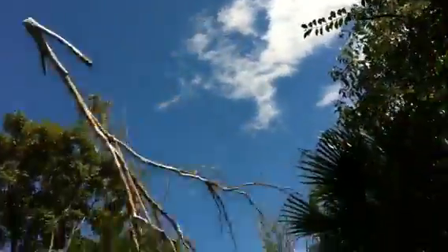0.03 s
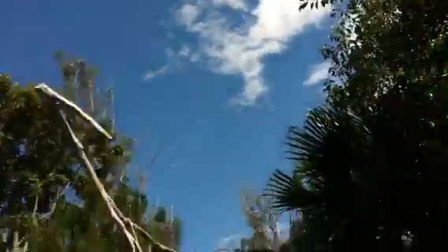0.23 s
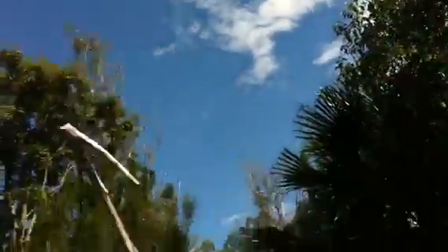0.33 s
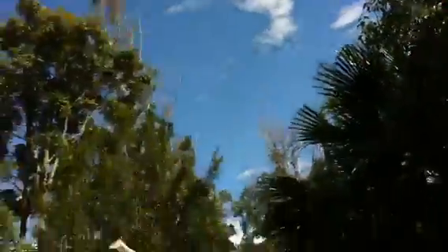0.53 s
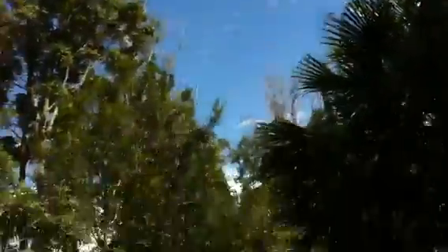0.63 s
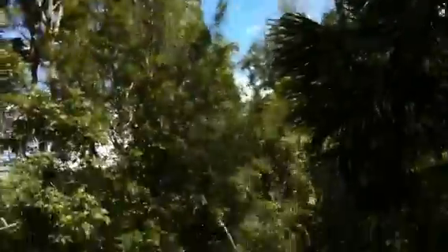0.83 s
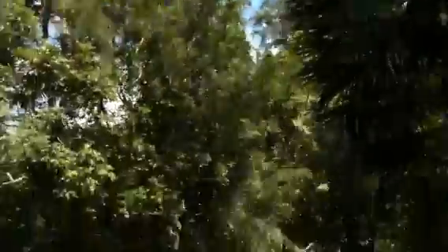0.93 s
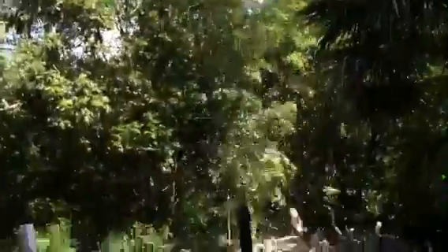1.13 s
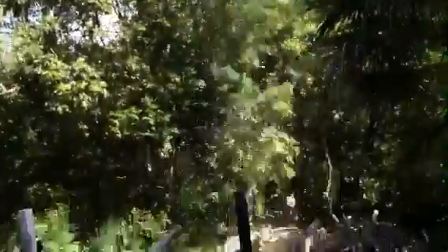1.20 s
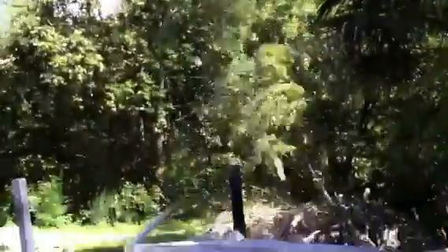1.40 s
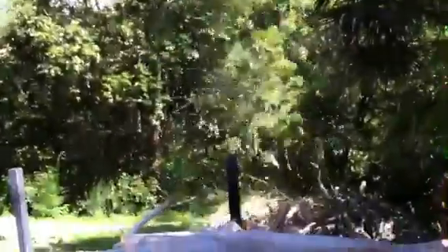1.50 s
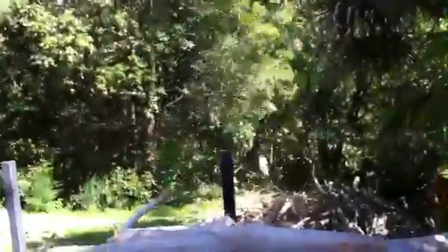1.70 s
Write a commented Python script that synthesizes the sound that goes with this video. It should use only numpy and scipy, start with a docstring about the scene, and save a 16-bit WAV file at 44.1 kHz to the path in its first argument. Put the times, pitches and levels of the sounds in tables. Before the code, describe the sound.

Dead tree crashing into bushland with a rush of breaking twigs and a thud.

```python
"""Dry twigs crackle in a thickening rush as a dead tree topples into the bush. Branches snap as the
crown is crushed, heavy limbs rumble, the trunk thuds down and bounces, and the debris settles.
Each brittle fracture is an impulse, and in the thicker wood it excites damped resonances; each blow
on the ground rings the modes of the trunk. The surrounding trees scatter the sound over a faint hiss."""
import sys
import numpy as np
from scipy import signal
from scipy.fft import rfft, irfft
from scipy.io import wavfile
from scipy.ndimage import uniform_filter1d

SR = 44100
rng = np.random.default_rng(int(sys.argv[2]) if len(sys.argv) > 2 else 0)


def store_pcm(level_fs):
    """Save levels as 16-bit WAV."""
    pcm = np.round(np.clip(level_fs, -1, 1) * 32767).astype(np.int16)
    wavfile.write(sys.argv[1], SR, np.atleast_2d(pcm).T)


N = 77175


def undb(db):
    """Decibels to amplitude ratio."""
    return 10 ** (np.asarray(db) / 20)


def unit(x):
    """Normalisation to rms 1."""
    return x / np.sqrt(np.mean(x ** 2) + 1e-20)


def burst(x, window_s=0.02):
    """Normalisation of a transient to the energy of one window at rms 1."""
    return x * np.sqrt(window_s * SR / (np.sum(x ** 2) + 1e-20))


def steady(x, size=2205):
    """Normalisation of a random stream by its running rms."""
    return x / np.sqrt(uniform_filter1d(x ** 2, size) + 1e-12)


def envelope(points):
    """Amplitude envelope through (time [s], level [dB]) points."""
    return undb(np.interp(np.arange(N) / SR, *np.array(points).T))


def colour(x, points, size=4096):
    """Minimum-phase filtering through (frequency [Hz], gain [dB]) points."""
    hz, db = np.array(points).T
    bin_hz = np.arange(size // 2 + 1) * SR / size
    gain = undb(np.interp(np.log(bin_hz + 1), np.log(hz), db))
    cepstrum = irfft(np.log(gain))
    cepstrum[1:size // 2] *= 2  # folding the cepstrum makes the filter causal
    cepstrum[size // 2 + 1:] = 0
    response = irfft(np.exp(rfft(cepstrum)))
    return signal.fftconvolve(x, response)[:len(x)]


def resonate(x, hz, q):
    """Forced response of a damped oscillator, with Q no lower than 0.5."""
    return signal.lfilter(*signal.iirpeak(min(hz, SR / 4), max(q, 0.5), fs=SR), x)


def clicks(per_s, spread_db):
    """Poisson process of impulses, mostly small and a few large."""
    strength = undb(spread_db * np.minimum(rng.exponential(size=N), 4.5))
    return (rng.random(N) < per_s / SR) * strength * np.sign(rng.standard_normal(N))


def crumble(x, decay_s, tail_db):
    """Exponential decay: the energy of each impulse feeds a short tail of noise."""
    pole = np.exp(-1 / (decay_s * SR / 2))
    power = signal.lfilter([1 - pole], [1, -pole], x ** 2)
    return x + undb(tail_db) * rng.standard_normal(len(x)) * np.sqrt(power)


def add(out, at_s, x):
    """Superposition of a sound at its onset time."""
    start = max(int(at_s * SR), 0)
    out[start:start + len(x)] += x[:N - start]


# Spectrum of the outdoor hiss (frequency [Hz], relative level [dB])
AIR_SPECTRUM = [(25, -1), (90, -15), (190, 6), (350, 5), (900, -2.5), (2500, -6.5), (5000, -4.5),
                (9000, -4.5), (16000, -13.5)]
def air(level_db=-45.5):
    """Stationary filtered noise gives a faint outdoor hiss."""
    return undb(level_db) * unit(colour(rng.standard_normal(N), AIR_SPECTRUM))


def scatter(x, t60_s=0.85, wet_db=-14.5):
    """Multiple scattering among the trees adds a dense, exponentially decaying tail."""
    t = np.arange(N) / SR
    tail = rng.standard_normal(N) * np.exp(-np.log(1000) * t / t60_s)
    return x + undb(wet_db) * signal.fftconvolve(x, tail / np.linalg.norm(tail))[:N]


STEM_HZ = 219.3
def stem_hum(at_s=0.105, level_db=-34.5, rise_s=0.025, fall_s=0.022):
    """Damped vibration: one mode of the stem swells and dies away after the first crack."""
    age = np.maximum(np.arange(N) / SR - at_s, 0)
    rise = np.minimum(age / rise_s, 1)
    fall = np.exp(-np.maximum(age - rise_s, 0) / fall_s)
    return undb(level_db) * rise * fall * np.sin(2 * np.pi * STEM_HZ * age)


# Envelope of the twig crackle (time [s], level [dB])
TWIG_LEVELS = [(0, -45), (.047, -48), (.060, -33), (.09, -27.5), (.12, -28.5), (.195, -39.5), (.215, -32.5),
               (.28, -33), (.36, -28), (.40, -22.5), (.44, -25.5), (.57, -24.5), (.672, -25.5), (.697, -18),
               (.74, -22.5), (.80, -22), (.92, -23.5), (1.01, -32), (1.13, -29.5), (1.23, -41),
               (1.37, -46.5), (1.5, -52.5), (1.75, -56)]
# Spectrum of the twig crackle (frequency [Hz], relative level [dB])
TWIG_SPECTRUM = [(80, -36), (150, -14), (400, -3), (1200, 2), (2500, 0.5), (5000, 4), (8500, 6), (12000, 2),
                 (16000, -4.5)]
def twigs():
    """Brittle fracture: thousands of dry twigs break, each with a sharp broadband tick."""
    ticks = crumble(clicks(per_s=3600, spread_db=1.5), decay_s=0.0044, tail_db=3.5)
    return steady(colour(ticks, TWIG_SPECTRUM)) * envelope(TWIG_LEVELS)


# Envelope of the small branches being crushed (time [s], level [dB])
CRUSH_LEVELS = [(0, -100), (.26, -40.5), (.42, -38), (.5, -28.5), (.53, -29.5), (.68, -29), (.73, -20),
                (.805, -19.5), (.84, -17.5), (.92, -20.5), (1.03, -28.5), (1.14, -26), (1.23, -40),
                (1.45, -49.5), (1.75, -54)]
# Spectral weighting of their cracks (frequency [Hz], relative gain [dB])
CRUSH_SPECTRUM = [(120, -24), (250, -2), (500, 0), (850, 0.5), (1500, -0.5), (2600, -2.5), (4500, -7),
                  (12000, -40)]
def small_branches(pitches=16, cracks_per_s=2200):
    """Impulse response: sticks of many sizes crack, each ringing for a few cycles at its own pitch."""
    cracks = 0
    for hz in np.geomspace(380, 3800, pitches):
        hits = crumble(clicks(cracks_per_s / pitches, spread_db=3), decay_s=0.0066, tail_db=0)
        cracks = cracks + resonate(hits, hz, q=5.2) + 0.36 * hits
    return steady(colour(cracks, CRUSH_SPECTRUM)) * envelope(CRUSH_LEVELS)


# Envelope of the heavy limbs on the ground (time [s], level [dB])
LIMB_LEVELS = [(0, -59), (.08, -56), (.2, -67), (.26, -46), (.33, -49), (.39, -42.5), (.43, -48),
               (.49, -36), (.53, -38.5), (.57, -39), (.66, -56), (.74, -29.5), (.92, -28), (1.03, -25),
               (1.17, -36), (1.24, -41), (1.45, -65.5), (1.75, -57)]
# Spectrum of their rumble (frequency [Hz], relative level [dB])
LIMB_SPECTRUM = [(25, -5), (70, -18), (120, -12.5), (165, -6.5), (210, -3), (270, -2.5), (340, -0.5),
                 (500, -5.5), (1200, -32)]
def limbs(ring_db=-2.5):
    """Forced vibration: limbs flex and knock on the ground in a rumble that keeps the stem ringing."""
    knocks = clicks(per_s=700, spread_db=2)
    rumble = steady(colour(knocks, LIMB_SPECTRUM))
    ring = steady(resonate(resonate(knocks, STEM_HZ, q=5), STEM_HZ, q=2.9))
    return unit(rumble + undb(ring_db) * ring) * envelope(LIMB_LEVELS)


# Branch fractures (time [s], wood level [dB], resonance [Hz], Q [1], decay time of the tear [s],
# splinter level relative to the wood [dB])
BRANCH_SNAPS = [(0.058, -69, 1620, 0.81, .010, 2), (0.1, -40, 2000, 0.35, 0.0017, 12.5),
                (.107, -38.5, 2300, .6, 0.013, 9.5), (0.207, -42, 2290, 1.3, 0.019, -4),
                (.331, -34.5, 2220, 1.6, .010, 2), (.370, -24.5, 940, 2.6, 0.015, -33),
                (.380, -25.5, 1010, 9, 0.0027, -21), (.472, -28, 1100, 1.1, 0.049, 3.5),
                (.5455, -21.5, 930, 1.3, 0.0046, 0), (.5625, -23, 830, 0.62, 0.013, 2.5),
                (.601, -31.5, 1180, 3.9, 0.0021, -6), (.633, -50, 1280, 1.2, .006, -8),
                (.701, -18, 904, 5.3, 0.033, -0.5), (0.729, -21.5, 1540, 0.47, 0.025, 6),
                (.770, -25.5, 824, 0.68, .008, 0.5), (.820, -13.5, 850, 2.4, .012, -11),
                (.832, -17, 696, 5.6, 0.013, -6.5), (.8665, -20.5, 1400, 0.74, .007, -4),
                (.908, -20, 950, 0.68, 0.013, -9), (.957, -24, 790, 1.1, 0.029, -14),
                (.981, -24.5, 610, 1.9, 0.011, -12), (1.060, -23, 750, 6, 0.056, -24),
                (1.110, -23.5, 733, 1.2, 0.034, -18), (1.139, -29, 1320, 1.2, 0.0025, -9),
                (1.351, -43.5, 1944, 0.55, .006, 1)]
# Spectrum of the splinters (frequency [Hz], relative level [dB])
SPLINTER_SPECTRUM = [(80, -22), (200, -4), (450, -1.5), (1200, 1), (2500, 3), (6000, 1.5), (9000, -2.5),
                     (12000, -5), (16000, -19)]
def snaps(size=8192, crack_db=16.5):
    """Cascading fracture: a branch cracks, then tearing fibres ring the wood and spit splinters."""
    out, t = np.zeros(N), np.arange(size) / SR
    for at_s, db, hz, q, tear_s, splinter_db in BRANCH_SNAPS:
        fibres = unit(clicks(per_s=3200, spread_db=1.5))[:size] * np.exp(-t / tear_s)
        force = crumble(fibres, decay_s=0.021, tail_db=-8)
        force[0] += undb(crack_db)
        wood = resonate(resonate(force, hz, q), hz, q=0.7)
        splinters = colour(crumble(fibres, decay_s=0.016, tail_db=4), SPLINTER_SPECTRUM)
        add(out, at_s, undb(db) * (burst(wood) + undb(splinter_db) * burst(splinters)))
    return out


# Blows of the trunk on the ground (time [s], level [dB], thump frequency [Hz])
TRUNK_BLOWS = [(1.058, -24, 333), (1.111, -24, 302), (1.125, -21, 344), (1.1391, -14.5, 297),
               (1.151, -25, 297), (1.265, -39, 247), (1.352, -43.5, 285), (1.569, -46, 315),
               (1.587, -45, 234)]
# Normal modes of the trunk (frequency [Hz], relative level [dB], time to decay by 60 dB [s])
TRUNK_MODES = [(168.3, 8, 0.19), (191.3, -26, 0.23), (232, -21, 0.14), (320, -21, .16), (373, -33, 0.083),
               (750, -2.5, 0.11)]
# Spectrum of the spray of earth (frequency [Hz], relative level [dB])
EARTH_SPECTRUM = [(25, 16), (60, -6), (110, -10.5), (200, 8.5), (330, 10), (600, -1), (1500, -9.5),
                  (6000, -46), (16000, -50)]
def trunk(size=16384, low_cut_hz=170, thump_q=4.8, ring_db=-2.5, earth_db=-4):
    """Impact excitation: each blow gives a damped thump, rings the log's modes and sprays earth."""
    out, t = np.zeros(N), np.arange(size) / SR
    highpass = signal.butter(3, low_cut_hz, "high", fs=SR, output="sos")
    for at_s, db, hz in TRUNK_BLOWS:
        thump = np.sin(2 * np.pi * hz * t) * np.exp(-np.pi * hz * t / thump_q)
        ring = 0
        for mode_hz, mode_db, t60_s in TRUNK_MODES:
            detuned_hz = mode_hz * (1 + 0.019 * rng.standard_normal())
            decay = np.exp(-np.log(1000) * t / t60_s)
            ring = ring + undb(mode_db) * np.sin(2 * np.pi * detuned_hz * t) * decay
        earth = colour(rng.standard_normal(size) * np.exp(-t / 0.03), EARTH_SPECTRUM)
        wood = signal.sosfilt(highpass, burst(thump) + undb(ring_db) * burst(ring))
        add(out, at_s, undb(db) * (wood + undb(earth_db) * burst(earth)))
    return out


def scene():
    """Superposition of the falling tree, its scattered sound and the outdoor hiss."""
    tree = twigs() + small_branches() + snaps() + stem_hum() + limbs() + trunk()
    return (scatter(tree) + air())[None]


def record(dry, bass_cut_hz=105, top_hz=15900):
    """Band limiting and saturation: a small microphone thins the bass, rounds peaks and cuts the top."""
    highpass = signal.butter(2, bass_cut_hz, "high", fs=SR, output="sos")
    lowpass = signal.ellip(10, 0.2, 80, top_hz, fs=SR, output="sos")
    rounded = np.tanh(signal.sosfilt(highpass, dry))
    return signal.sosfilt(lowpass, rounded)


dry = scene()
out = record(dry)
store_pcm(out)
```